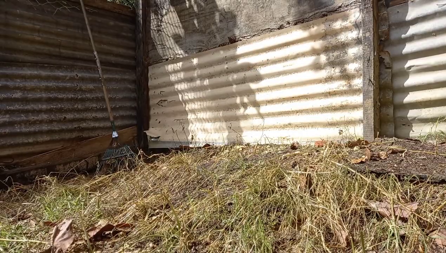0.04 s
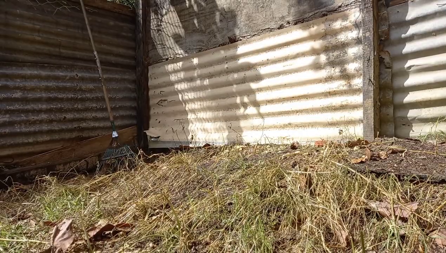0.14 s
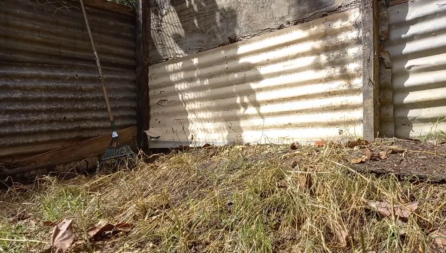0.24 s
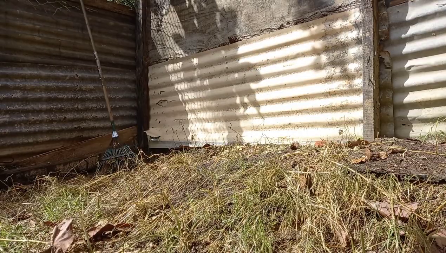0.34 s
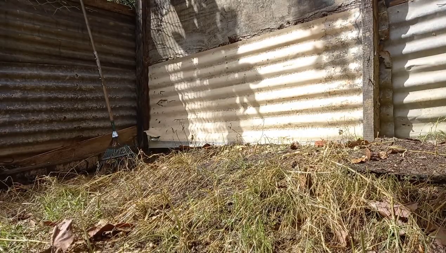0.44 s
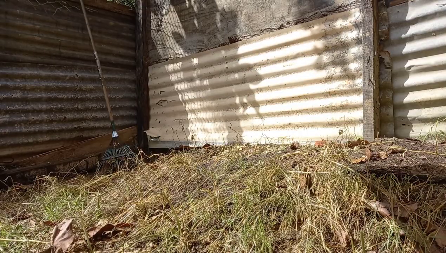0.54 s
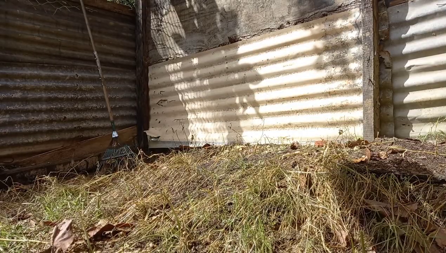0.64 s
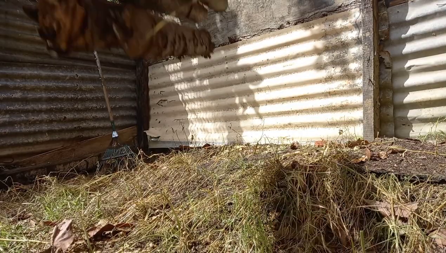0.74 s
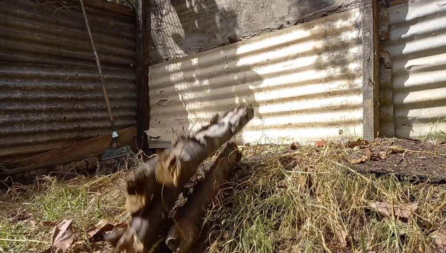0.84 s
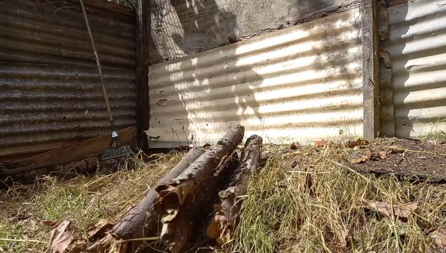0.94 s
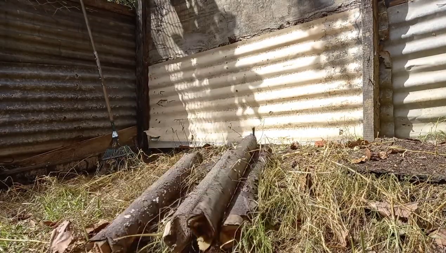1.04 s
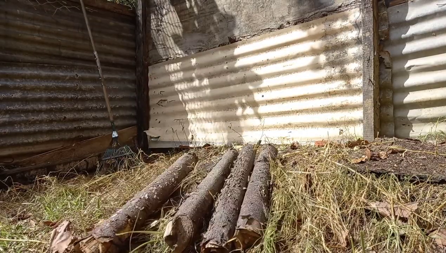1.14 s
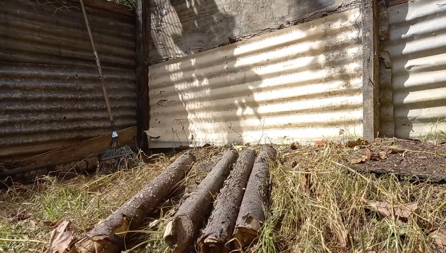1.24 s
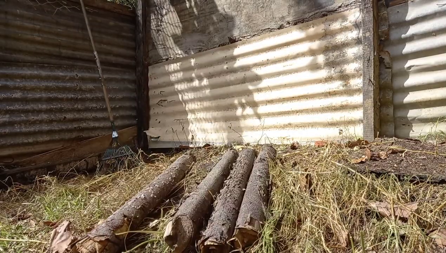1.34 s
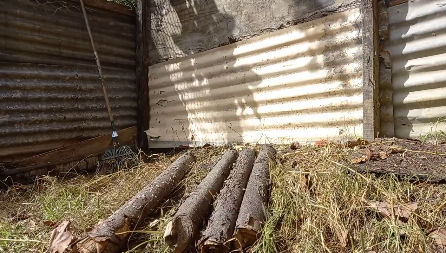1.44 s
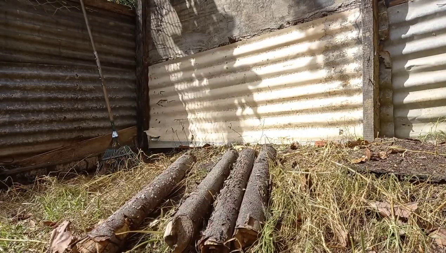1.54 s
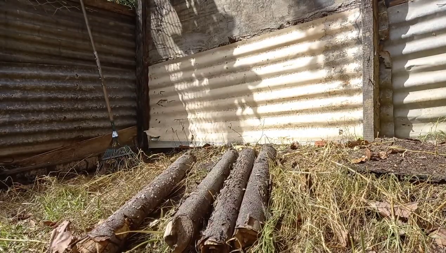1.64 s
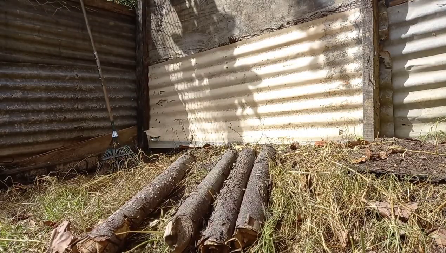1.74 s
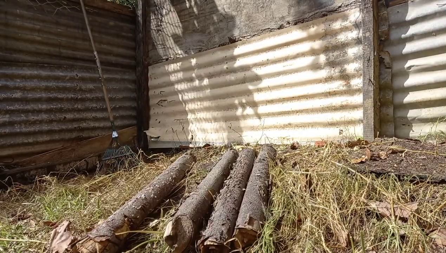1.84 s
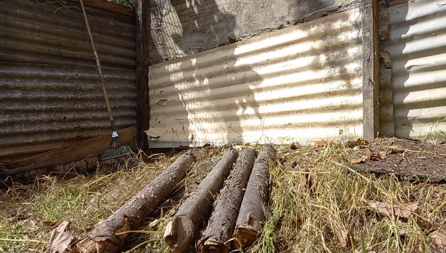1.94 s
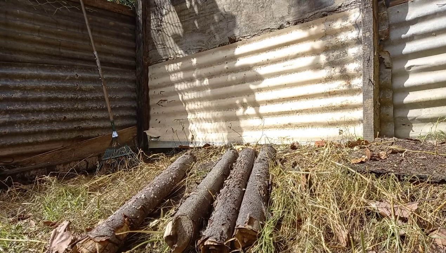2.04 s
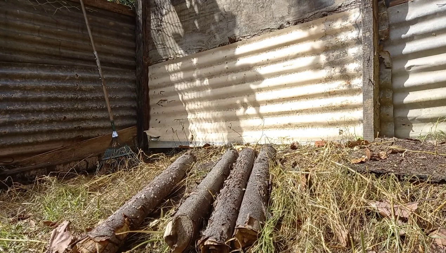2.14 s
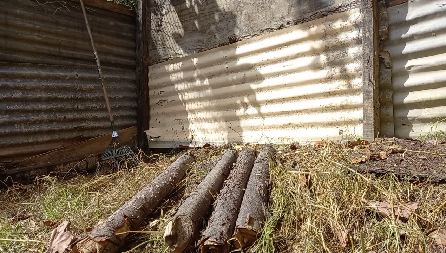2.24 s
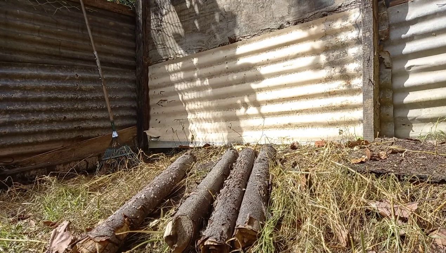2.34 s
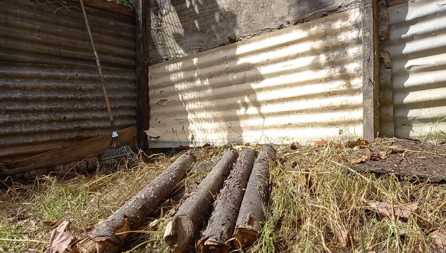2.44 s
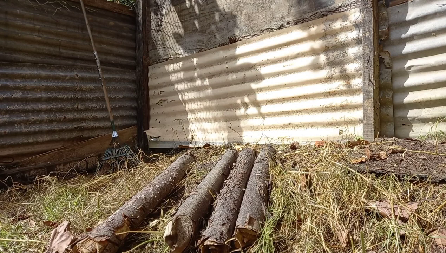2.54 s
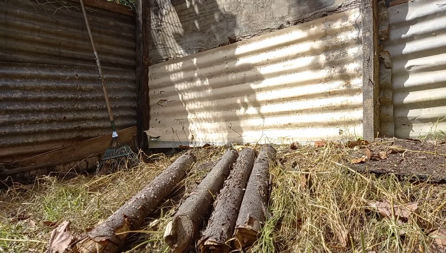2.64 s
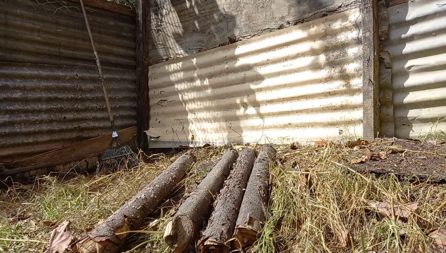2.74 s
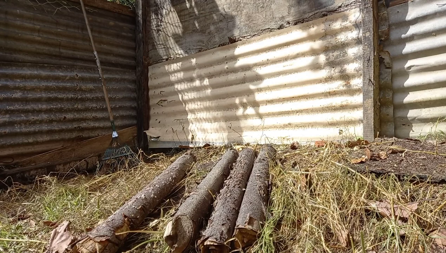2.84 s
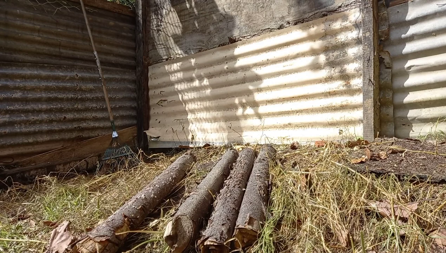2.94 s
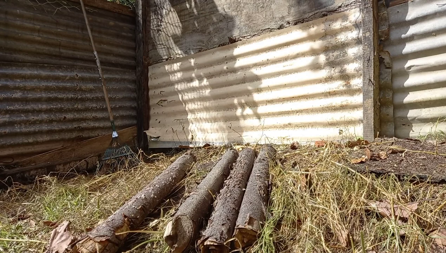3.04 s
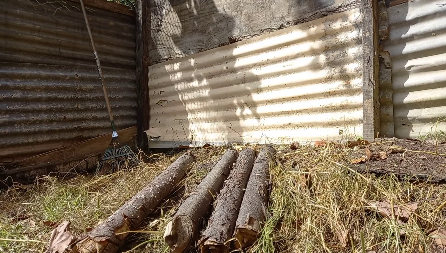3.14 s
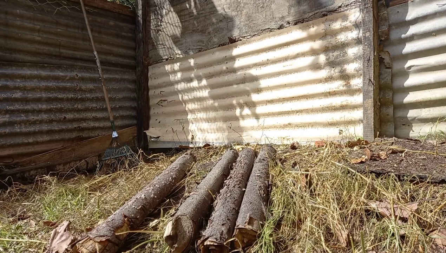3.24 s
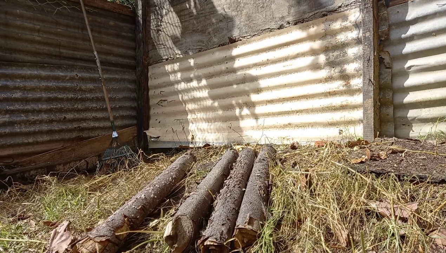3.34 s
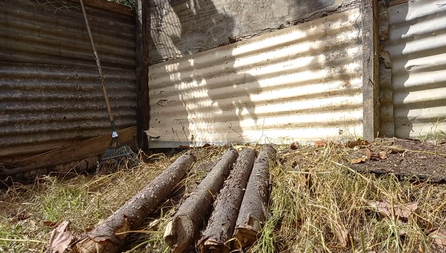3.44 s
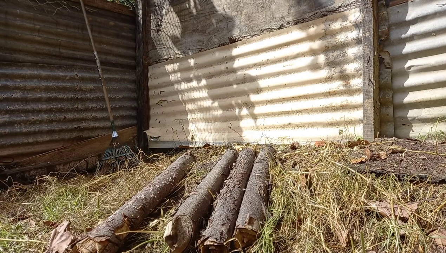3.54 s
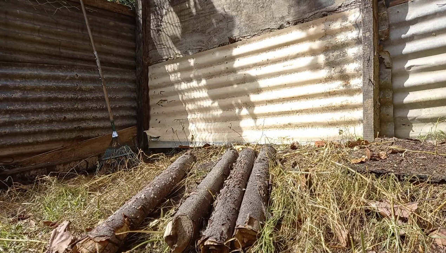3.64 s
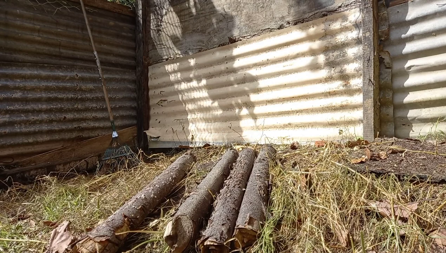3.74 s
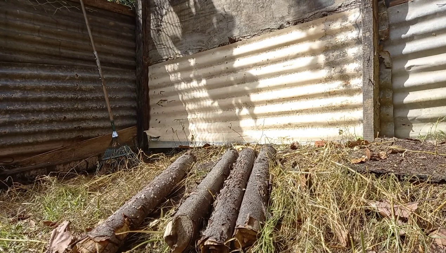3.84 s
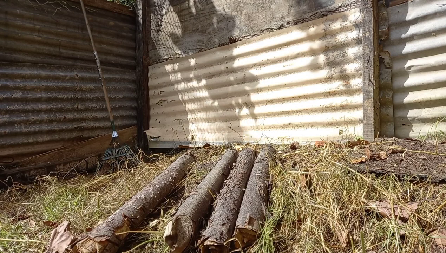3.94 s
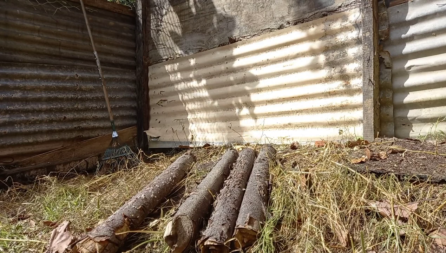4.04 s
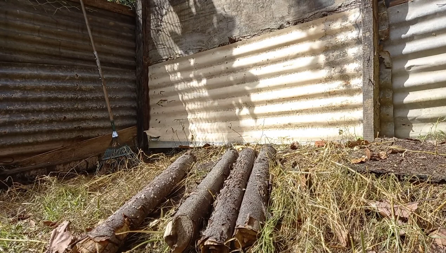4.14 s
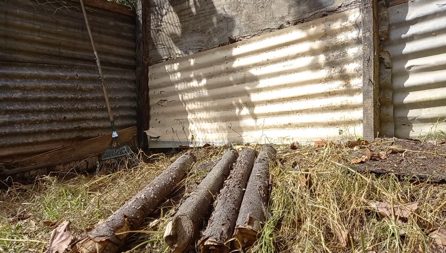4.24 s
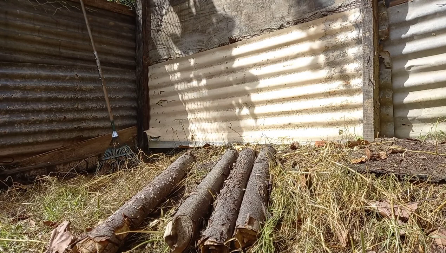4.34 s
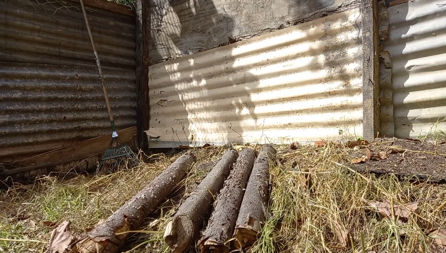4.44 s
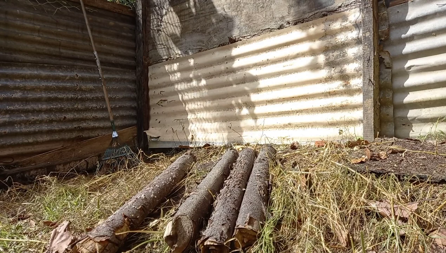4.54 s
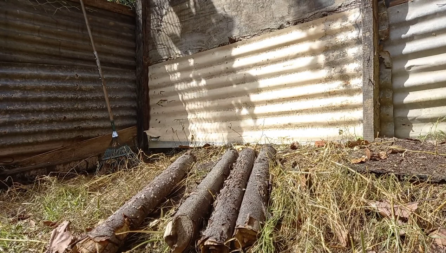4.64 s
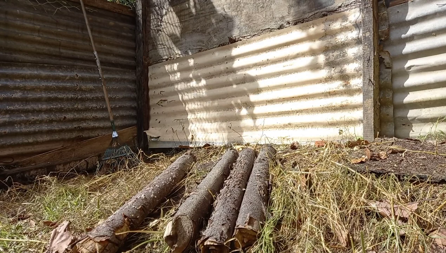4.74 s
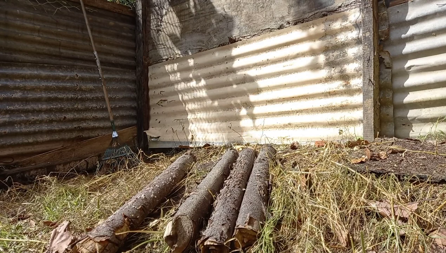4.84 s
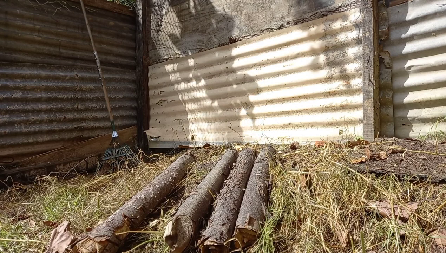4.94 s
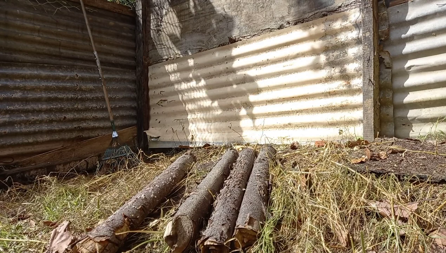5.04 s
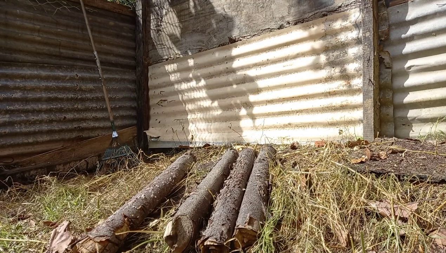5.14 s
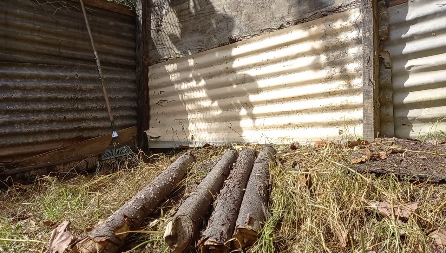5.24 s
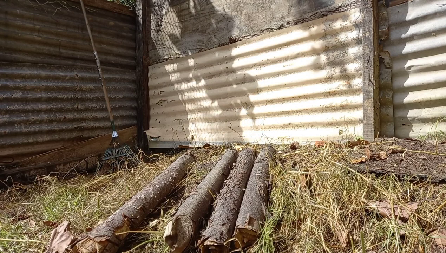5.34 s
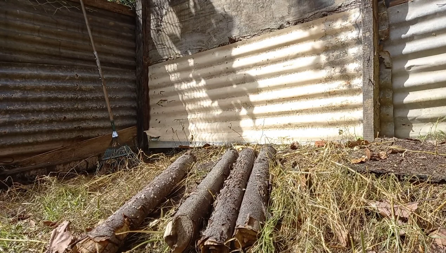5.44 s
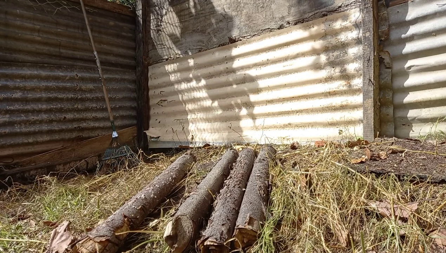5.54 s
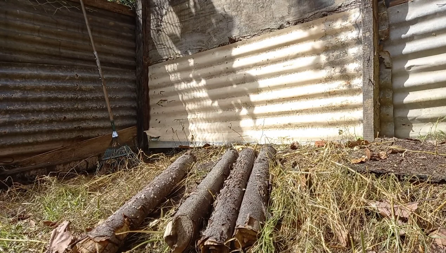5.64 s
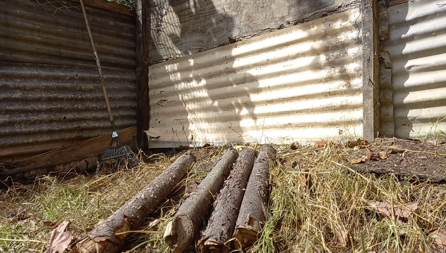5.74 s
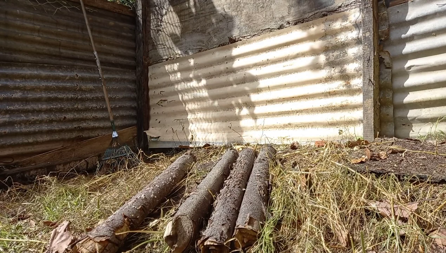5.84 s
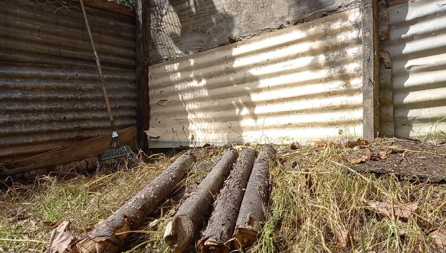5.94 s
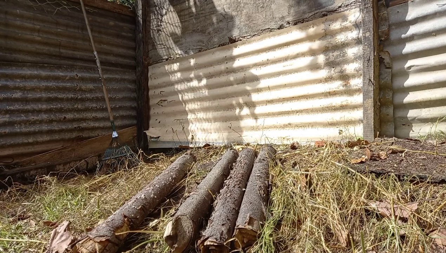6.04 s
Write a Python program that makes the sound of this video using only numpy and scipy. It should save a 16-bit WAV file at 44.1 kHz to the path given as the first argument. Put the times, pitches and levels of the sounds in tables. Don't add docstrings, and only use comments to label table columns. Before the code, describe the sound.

A quiet open-air yard with a soft hush, low town rumble and thin cicada song swelling about three times a second. At 0.11 s logs knock together once, moderately and dry, with grass rustling under shifting feet. At about 0.88 s the load lands right in front: a very loud cluster of hollow wooden knocks lasting under 0.1 s, with crushed grass, sharp stalk snaps and a deep soil thud. A sheet-iron fence hums low until about 1.15 s, as small crackles mark the logs rolling at 1.04-1.2 s. A bird chirps faintly at 1.2 s. The background dips briefly, then returns. Around 2.5-2.7 s feet crunch and snap stalks with faint wood taps; a weak distant engine hums. Faint rustles and wood taps follow at 3.3-4.2 s, a low thump at 3.9 s and bird whistles at 4 s. More whistles come at 5-5.35 s, with a stronger deep thump at 5.2 s, then quiet rustling.

```python
import sys
import numpy as np
from scipy import signal
from scipy.fft import rfft, irfft, next_fast_len
from scipy.io import wavfile
from scipy.ndimage import uniform_filter1d, map_coordinates

SR = 44100
rng = np.random.default_rng(int(sys.argv[2]) if len(sys.argv) > 2 else 0)


def inscribe(sig):
    pcm = np.round(np.clip(np.atleast_2d(sig).T, -1, 1) * 32767)
    wavfile.write(sys.argv[1], SR, pcm.astype(np.int16))


def gain_from_db(level_db):
    decades = np.asarray(level_db, float) / 20
    return 10 ** decades


N = 268727
T = np.arange(N) / SR


def unit(x):
    return x / np.sqrt(np.mean(x ** 2) + 1e-20)


def along(points, hz):
    f, v = np.transpose(points)
    return np.interp(np.log(hz + 1), np.log(f + 1), v)


def curves(rows):
    s, *cols = np.transpose(rows)
    return [np.interp(T, s, c) for c in cols]


def wobble(rate):
    return map_coordinates(rng.standard_normal(int(N * rate / SR) + 4), [T * rate])


def noise():
    return rng.standard_normal((2, N))


def filtered(x, response):
    m = next_fast_len(N + SR // 2)
    return irfft(rfft(x, m) * response(np.fft.rfftfreq(m, 1 / SR)), m)[..., :N]


def coloured(x, points):
    return unit(filtered(x, lambda hz: gain_from_db(along(points, hz))))


def ports(x, lead_s, pan_db=0):
    half = np.array([[1], [-1]]) / 2
    return filtered(x, lambda hz: gain_from_db(pan_db * half) * np.exp(2j * np.pi * hz * lead_s * half))


def bursts(s, db, rise_s, fall_s, floor_db):
    tail_bend = 1.096
    gap = T[::32] - np.array(s)[:, None]
    rising = -gap / np.abs(rise_s)[:, None]
    falling = np.abs(gap / np.array(fall_s)[:, None]) ** tail_bend
    loss = np.where(gap < 0, rising, falling)
    power = (gain_from_db(np.array(db)[:, None] - 20 * loss) ** 2).sum(0) + gain_from_db(floor_db) ** 2
    return np.interp(T, T[::32], np.sqrt(power))


# hz, likeness (0 to 1)
LIKENESS = [(60, .96), (200, .93), (400, .7), (900, .2), (2000, 0), (15000, 0)]


def diffuse(pair, spectrum):
    def mix(hz):
        turn = np.arccos(np.clip(along(LIKENESS, hz), -1, 1)) / 2
        return gain_from_db(along(spectrum, hz)) * [np.cos(turn), np.sin(turn)]
    mid, side = filtered(pair, mix)
    return unit(np.array([mid + side, mid - side]))


def echoes(x, decays):
    hz, t, z = signal.stft(rng.standard_normal((2, SR // 2)), SR, nperseg=256)
    alike = along(LIKENESS, hz)[:, None]
    z[1] = alike * z[0] + np.sqrt(1 - alike ** 2) * z[1]
    fade = gain_from_db(-60 * t / along(decays, hz)[:, None])
    tail = signal.istft(z * fade, SR, nperseg=256)[1]
    late = np.pad(x, (300, 0))[None]
    return signal.fftconvolve(late, tail / np.linalg.norm(tail[0]), axes=1)[:, :N]


# hz, level_db (per Hz)
AIR_SPECTRUM = [(15, -43.5), (25, -16), (80, -5), (190, -21.5), (335, -14.5), (1160, -28), (1740, -28),
                (2050, -22.5), (2480, -35.5), (3160, -40), (4140, -7), (4870, -25.5), (6740, -20.5),
                (7510, -35), (16000, -47.5)]


def air():
    return gain_from_db(-63) * diffuse(noise(), AIR_SPECTRUM)


def hum(rows, rough_db):
    hz, db = curves(rows)
    on = uniform_filter1d(1. * (T > rows[0][0]) * (T <= rows[-1][0]), size=2000)
    level = np.sqrt(2) * gain_from_db(db + rough_db * wobble(15))
    return on * level * np.sin(2 * np.pi * np.cumsum(hz) / SR)


# time_s, firing_hz, level_db
ENGINE_HUM = [
    (2.2, 56.5, -77.5),
    (2.78, 59.8, -50.5),
    (3.33, 67.2, -63.5),
    (3.91, 66.2, -62.5),
    (4.15, 66.5, -75.5),
    (5.12, 63.9, -59),
    (5.22, 61.7, -58),
    (5.44, 65.3, -63),
    (6.09, 62.5, -66),
]


def engine():
    return hum(ENGINE_HUM, rough_db=1.5)


# peak_s, boom_db, body_db, rise_s, fall_s
GROUND_THUMPS = [(.12, -78, -58, 0.045, 0.27), (.22, -63, -62, 0.17, 0.37),
                 (0.881, -28.5, -26.5, 0.0037, 0.096), (.66, -80, -69, 0.18, 0.26),
                 (.96, -44, -61, 0.058, 0.089), (1.121, -48, -51.5, .25, 0.072),
                 (1.27, -54.5, -75, .1, 0.15), (2.53, -52.5, -64.5, 0.096, 0.64),
                 (3.37, -71, -65, 0.55, 0.46), (3.864, -40, -47, 0.13, 0.17),
                 (4.16, -69.5, -64, 0.12, 0.16), (5.21, -30.5, -47, 0.062, 0.14),
                 (5.301, -48, -60, 0.1, 0.21), (5.16, -59.5, -55.5, 0.05, .1)]
# hz, level_db (per Hz)
BOOM_SPECTRUM = [(15, -57), (25, -25), (40, -16), (48, -7.5), (70, 3), (102, 4.5), (123, -6), (150, -28.5),
                 (200, -49.5), (330, -120)]
# hz, level_db (per Hz)
BODY_SPECTRUM = [(71, -27.5), (120, -9.5), (177, -20), (231, -20.5), (300, -18.5), (600, -33.5),
                 (780, -68.5), (1320, -120)]


def thumps():
    rumble_db, murmur_db = -66, -74
    s, boom_db, body_db, rise_s, fall_s = np.transpose(GROUND_THUMPS)
    boom = bursts(s, boom_db - 3.0, rise_s, fall_s, rumble_db - 2.5)
    body = bursts(s, body_db, rise_s, fall_s, murmur_db)
    return boom * diffuse(noise(), BOOM_SPECTRUM) + body * diffuse(noise(), BODY_SPECTRUM)


# time_s, pitch_hz, level_db
SHEET_HUM = [
    (0.93, 91.54, -37),
    (0.996, 82.97, -39.5),
    (1.124, 82, -40.5),
    (1.154, 82.7, -54),
    (1.4, 83.4, -68),
]


def fence():
    return hum(SHEET_HUM, rough_db=.6)


# start_s, length_s, from_hz, to_hz, level_db
WHISTLES = [(1.218, 0.042, 4870, 4820, -55), (1.273, 0.07, 4400, 2604, -60.5),
            (3.936, 0.024, 5220, 5120, -59.5), (3.958, 0.036, 5140, 4750, -52),
            (3.993, 0.082, 4560, 3100, -57.5), (4.007, 0.033, 4950, 4980, -63),
            (4.992, 0.034, 4480, 5257, -51.5), (5.012, 0.035, 5420, 5470, -53.5),
            (5.049, 0.047, 5450, 5420, -68), (5.002, 0.05, 4770, 4570, -56.5),
            (5.058, 0.065, 3330, 3200, -61.5), (5.121, 0.028, 2770, 2705, -67),
            (5.213, 0.081, 5250, 3260, -49), (5.238, 0.086, 5470, 4340, -58),
            (5.291, 0.034, 3300, 4750, -55), (5.329, 0.045, 4830, 4600, -63.5)]
# hz, t60_s (time to die by 60 dB)
FAR_ECHO = [(2600, 0.63), (6100, 0.56)]


def bird():
    out, flutter = np.zeros(N), 1.2 * wobble(500)
    for s, length, from_hz, to_hz, db in WHISTLES:
        u = np.arange(int(length * SR)) / (length * SR)
        start = round(s * SR)
        glide = 2 * np.pi * np.cumsum(from_hz + (to_hz - from_hz) * u) / SR
        hoarse = flutter[start:][:len(u)] * (abs(to_hz - from_hz) + 250) / 1300
        out[start:][:len(u)] += gain_from_db(db) * np.sin(np.pi * u) ** .4 * np.sin(glide + hoarse)
    song = out * gain_from_db(2.5 * wobble(300))
    return ports(song, lead_s=-0.000388) + echoes(song, FAR_ECHO)


def cicada(rate, jitter, chorus, modes):
    turns = np.cumsum(rate * (1 + jitter * wobble(60))) / SR
    clicks = np.diff(np.floor(turns), prepend=0) * gain_from_db(2.6 * rng.standard_normal(N))
    drive = ports(unit(clicks), lead_s=-.0006) + chorus * noise()

    def belly(f):
        return np.array([[(1j * f * width / (hz * hz - f * f + 1j * f * width)) ** 2] for hz, width, _ in modes])
    return sum(mode[2] * unit(ring) for mode, ring in zip(modes, filtered(drive, belly)))


# peak_s, level_db
SONG_SWELLS = [(0, -56), (0.323, -55), (0.637, -55), (1.0, -65), (1.45, -59.5), (1.76, -60.5),
               (2.07, -60.5), (2.44, -55.5), (2.82, -52.5), (3.13, -53), (3.448, -54.5), (3.65, -69.5),
               (3.815, -53.5), (3.865, -56.5), (4.155, -54), (4.465, -54), (4.74, -72.5), (4.949, -70),
               (5.25, -56), (5.55, -68), (5.731, -66), (5.939, -66)]


def swells(db, late_s, rise_s, fall_s):
    t = T[::64]
    gap = t - late_s - np.array(SONG_SWELLS)[:, :1]
    rising = np.exp(-(gap / rise_s) ** 2)
    sinking = np.exp(-(np.abs(gap) / fall_s) ** 1.4)
    shape = np.where(gap < 0, rising, sinking)
    return np.interp(T, t, (gain_from_db(db[:, None]) * shape).sum(0))


def insects():
    db = np.array(SONG_SWELLS)[:, 1]
    early = 0.79 * swells(db, late_s=-0.014, rise_s=0.01527, fall_s=.04) + gain_from_db(-81.5)
    middle = 1.3 * swells(db, late_s=-.005, rise_s=.025, fall_s=0.11) + gain_from_db(-80.0)
    later = 0.59 * swells(db, late_s=0.017, rise_s=.04, fall_s=0.16) + gain_from_db(-75.5)
    high_modes = [(3814, 66, early), (4037, 200, middle), (4190, 120, later)]
    high = cicada(rate=200, jitter=0.048, chorus=0.6, modes=high_modes)
    low_db = -61 + (db + 52.5)
    low_swells = swells(low_db, late_s=0.018, rise_s=0.035, fall_s=0.075)
    low_gain = gain_from_db(1.1 * wobble(30)) * (low_swells + gain_from_db(-74.0))
    return high + cicada(rate=110, jitter=0.16, chorus=0.98, modes=[(2084, 250, low_gain)])


def crackle(rate, spread_db):
    hits = rng.random((3, N)) < rate / SR
    sizes = gain_from_db(spread_db * rng.exponential(size=(3, N))) * rng.normal(size=(3, N))
    return 0.45 * unit(hits * sizes) + rng.standard_normal((3, N))


# peak_s, crunch_db, rise_s, fall_s, tips_db (over the crunch)
LOAD_CRUSH = [(.853, -58.5, .012, .05, -9.5), (.87, -51, .02, .03, 2), (0.88, -28.5, .008, .015, -6.5),
              (.894, -31.5, .012, .07, -7.5), (.99, -62.5, .05, 0.16, -2.5),
              (1.042, -50.5, .012, 0.042, -8), (1.069, -50, .004, .02, -3), (1.082, -44.5, .008, .025, -2),
              (1.098, -45, .012, .05, 0.5), (1.135, -52.5, .06, 0.061, 1), (1.21, -65.5, .08, 0.16, -1.5)]
# peak_s, crunch_db, rise_s, fall_s, tips_db (over the crunch)
FOOTSTEPS = [(.03, -68.5, 0.18, 0.23, -5.5), (0.121, -53, 0.068, .17, -1.5), (.22, -63, 0.21, 0.091, -3.5),
             (.49, -61.5, 0.092, .12, -3), (1.82, -69, 0.11, 0.286, -0.5), (2.051, -66, 0.13, .15, -0.5),
             (2.21, -69.5, 0.16, 0.1, -0.5), (2.4, -70.5, 0.28, 0.195, -7.5),
             (2.495, -47, 0.008, 0.086, -3), (2.513, -48.5, .02, .06, -2), (2.535, -47.5, .03, .04, -4),
             (2.617, -48, .01, .03, -8), (2.577, -50, 0.075, 0.11, 1.5), (2.633, -43.5, 0.036, 0.038, -7.5),
             (2.688, -48, 0.015, .025, -2), (2.7, -53.5, 0.035, 0.082, -2), (2.9, -70.5, 0.75, 0.31, -7.5),
             (3.322, -68.5, 0.201, 0.29, -5.5), (3.431, -58, 0.16, 0.16, -3.5),
             (3.54, -74.5, 0.09, .12, 5.5), (3.736, -66.5, 0.059, 0.17, 0.5),
             (3.83, -61.5, 0.14, 0.24, -1.5), (4.03, -66, 0.48, 0.14, -8), (4.15, -65, 0.12, 0.142, -6),
             (4.52, -72.5, 0.15, 0.12, -11), (5.19, -57, 0.147, 0.334, -14.5),
             (5.757, -69, 0.022, 0.2, -1.5), (5.899, -72.5, .15, 0.1106, -2)]
# peak_s, level_db, rise_s, fall_s
TURF_PRESS = [(0.122, -52, 0.046, 0.16), (.24, -63.5, 0.66, 0.33), (.5, -64.5, 0.1, 0.36),
              (.853, -65, 0.045, 0.13), (0.879, -30.5, .008, .012), (0.889, -30, 0.0051, 0.09),
              (1.083, -49.5, 0.066, 0.083), (1.19, -61.5, 0.083, 0.097), (1.881, -66, 0.17, .2),
              (2.23, -60, 0.075, 0.13), (2.476, -61.5, 0.05, 0.11), (2.508, -53, 0.09, 0.22),
              (2.64, -53, 0.14, 0.19), (2.951, -70, 0.21, 0.17), (3.731, -70, 0.077, .1),
              (4.47, -70.5, 0.039, 0.21), (3.43, -65, 0.29, 0.24), (3.85, -69, 0.17, 0.28),
              (4.15, -68, 0.097, 0.12), (5.25, -64, .15, 0.11)]
# hz, level_db (per Hz)
STALK_SPECTRUM = [(710, -33.5), (1200, -10), (1510, -10.5), (1820, -17), (1950, -6), (2570, -1.5),
                  (3050, -3.5), (3300, -3), (4100, -1), (4760, -1.5), (6310, 0.5), (7800, -19),
                  (10100, -44.5), (17200, -120)]
# hz, level_db (per Hz)
TIP_SPECTRUM = [(4120, -31.5), (7000, -3), (7740, -9.5), (8980, -3), (12700, -1.5), (16000, -7)]
# hz, level_db (per Hz)
WEIGHT_SPECTRUM = [(120, -45.5), (200, -22), (381, -1.5), (436, -2), (590, -1.5), (1830, -0.5), (2400, -8),
                   (3120, -31), (5280, -120)]
# hz, level_db
SHOE_COLOUR = [(900, 0), (1700, -3), (2800, 1), (4900, -0.5), (6500, -1), (7500, -1)]


def grass():
    s, db, rise_s, fall_s, tips_db = np.transpose(LOAD_CRUSH + FOOTSTEPS)
    crunch = bursts(s, db, rise_s, fall_s, -81.5)
    tips = bursts(s, db + tips_db, rise_s, fall_s, -91.5)
    press = bursts(*np.transpose(TURF_PRESS), -82.5)
    fibres = crackle(rate=3000, spread_db=2.8) * gain_from_db(.8 * wobble(45) + 1.5 * wobble(200))
    ahead = (T > .8) & (T < 1.5)
    direct = ports(fibres[0] * ahead, lead_s=0) + ports(fibres[0] * ~ahead, lead_s=.0003, pan_db=-1)
    near = 0.58 * direct + fibres[1:]
    weight = coloured(0.98 * direct + 0.78 * fibres[1:], WEIGHT_SPECTRUM)
    stalks = coloured(near, STALK_SPECTRUM)
    underfoot = filtered(stalks, lambda hz: gain_from_db(along(SHOE_COLOUR, hz)))
    stalks = np.where(ahead, stalks, underfoot)
    dry_tips = coloured(near, TIP_SPECTRUM)
    return gain_from_db(5.5) * crunch * stalks + gain_from_db(4.5) * tips * dry_tips + gain_from_db(4.0) * press * weight


# start_s, peak_db, pitch_hz
LOG_STALKS = [(0.849, -33.5, 1890), (0.854, -36, 2200), (.863, -23, 5336), (.867, -32.5, 2300),
              (.8777, -6, 2460), (0.8868, -9.5, 1630), (.8964, -7, 2261), (.907, -16.5, 2200),
              (1.039, -28.5, 5740), (1.043, -32.5, 4500), (1.0712, -28.5, 3040), (1.0806, -25, 5840),
              (1.0976, -25.5, 6030), (1.1005, -28.5, 3230), (1.1238, -24.5, 6470), (1.147, -30.5, 6300),
              (1.184, -28, 6530), (1.1872, -32, 6400), (1.2241, -42.5, 6630)]
# start_s, peak_db, pitch_hz
FOOT_STALKS = [(0.1047, -41, 2120), (0.1542, -33, 6943), (.192, -29.5, 1910), (.196, -40, 4600),
               (.2269, -39, 6636), (0.2514, -43.5, 1600), (.266, -46, 1550), (.375, -45, 1700),
               (.515, -46.5, 2040), (.4618, -46.5, 4190), (.4942, -40.5, 2170), (.8102, -38.5, 2056),
               (2.026, -43, 6540), (2.062, -36, 4200), (2.1536, -48.5, 4310), (2.2122, -36.5, 6770),
               (2.2127, -33, 2230), (2.4538, -35.5, 2290), (2.4913, -30.5, 6630), (2.5345, -31, 6013),
               (2.5681, -26.5, 2550), (2.615, -31, 3380), (2.6278, -26, 5700), (2.633, -29.5, 4605),
               (2.6852, -32, 6217), (2.6872, -23, 6020), (3.0203, -53, 6100), (3.4074, -38, 3900),
               (3.4254, -35.5, 4220), (3.7359, -46, 4166), (3.7844, -44.5, 3800), (3.7108, -45.5, 6700),
               (5.6728, -55.5, 6100), (5.7501, -47.5, 5550), (5.804, -46.5, 4640), (5.851, -51.5, 6630)]


def snaps():
    body, edge, t = np.zeros((2, N + SR)), np.zeros((2, N + SR)), np.arange(SR // 40) / SR
    events = [(*row, 1.5) for row in LOG_STALKS] + [(*row, 7) for row in FOOT_STALKS]
    for s, db, hz, pan_db in sorted(events):
        ring = .7 * np.sin(2 * np.pi * hz * t) * gain_from_db(-60 * t / (.003 + 7 / hz))
        click = gain_from_db(db - 60 * t / .012) * rng.standard_normal((3, len(t)))
        edge_db = -9.5 + 6 * np.log2(hz / 6000)
        for side, (sign, late) in enumerate([(0.81, 0), (-1.3, 13)]):
            start, pan = round(s * SR) + late, gain_from_db(sign * pan_db)
            burst = pan * (click[0] + 0.23 * click[1 + side])
            body[side, start:][:len(t)] += gain_from_db(db) * pan * ring + 0.45 * np.sqrt(hz / 6000) * burst
            edge[side, start:][:len(t)] += gain_from_db(edge_db) * burst

    def dull(hz):
        return 1 / (1 + (hz / 7300) ** 16)
    low_part = filtered(body[:, :N], lambda hz: dull(hz) * hz ** 2 / (hz ** 2 + 1100 ** 2))
    return low_part + filtered(edge[:, :N], lambda hz: 1 - dull(hz))


# start_s, peak_db, struck_hz, crack_db, width_octaves (of the modes set ringing)
LOG_KNOCKS = [(0.1116, -18.5, 513, -27, 0.21), (.1135, -33, 1070, -25, 0.11), (.1192, -22, 540, -29.5, 0.1),
              (.13, -30, 520, -20, 0.42), (0.13, -38, 1100, -20, 0.13), (.141, -32.5, 540, -17.5, 0.19),
              (.152, -45, 540, -21, .19), (.2505, -53, 540, -8, 0.27), (0.854, -41.5, 1117, -14, 0.19),
              (0.874, -28, 1466, -8.5, 0.43), (0.8785, -15, 290, -8, 0.13),
              (0.8883, -7.5, 1466, -13.5, .35), (0.8893, -2.5, 500, -21.5, 0.28),
              (.8948, 0, 870, -21, 0.22), (.8965, -14.5, 2515, -13, .2), (.9015, -14.5, 500, -18, .2),
              (0.9064, -8.5, 480, -12.5, 0.3), (.913, -9, 423.5, -21, 0.33),
              (.923, -16.5, 423.8, -23, 0.43), (0.9294, -10.5, 474, -24.5, 0.23),
              (.940, -21.5, 433, -21.5, 0.29), (0.963, -35.5, 794, -13.5, 0.55),
              (1.045, -40.5, 1045, -11.5, 0.22), (1.083, -35, 473, -3, 0.19),
              (2.508, -35.5, 596, -6.5, 0.34), (2.527, -34, 560, -10, 0.26), (3.324, -44, 324, -4.5, 0.45),
              (4.138, -38.5, 407, -12, 0.2), (4.158, -43, 404, -7.5, 0.39)]
# pitch_hz, level_db, t60_s (time to die by 60 dB)
WOOD_MODES = [(290, -12, 0.076), (343.6, -4.5, 0.21), (420.3, 0.5, 0.088), (461.3, -4, 0.077),
              (540, 3, 0.039), (794, -3, 0.027), (903, 4, 0.02), (1045, -7.5, 0.021), (1117, -4.5, 0.08),
              (1466, -11, 0.077), (1586.5, -11, 0.14), (1910, -5, 0.059), (2207, -12, 0.15),
              (2515, -10, 0.046), (2920, -8.5, .06)]
LOG_RESTS = [.126, .166, .3, .868, .9, .945, 1.0, 1.06, 1.13, 2.55, 3.37, 4.19]
# pitch_hz, level_db, t60_s
SOIL_THUD = [
    (99, -17, .16),
    (185, -11, 0.047),
    (55, -24.5, .08),
]
# hz, t60_s
YARD_ECHO = [(100, 0.26), (500, .16), (2000, .24), (8000, .18)]


def logs():
    out, t = np.zeros((2, N + SR)), np.arange(SR // 3) / SR
    hz, level, t60 = np.transpose(WOOD_MODES)[..., None]
    for s, db, pitch_hz, crack_db, width in LOG_KNOCKS:
        rest_s = min(r for r in LOG_RESTS if r > s)
        settle = gain_from_db(-60 * np.maximum(t + s - rest_s, 0) / .03)
        reach_db = np.maximum(-6 * (np.log2(hz / pitch_hz) / max(width, .1)) ** 2, -19)
        ring_db = level + reach_db + rng.normal(0, 1, hz.shape) - 60 * t / t60
        ring = gain_from_db(ring_db) * np.sin(2 * np.pi * hz * t)
        crack = gain_from_db(crack_db - 3.0 - 60 * t / 0.011) * rng.standard_normal(len(t))
        ends = np.array([ring[::2].sum(0), ring[1::2].sum(0)])
        contact = 1 - np.exp(-t / (0.001 * gain_from_db(-.15 * db)))
        out[:, round(s * SR):][:, :len(t)] += gain_from_db(db - 4.5) * (ends * settle * contact + crack / 2)
    landing = round(.8775 * SR)
    for hz, db, t60 in SOIL_THUD:
        thud = gain_from_db(db - 7 - 60 * t / t60) * np.sin(2 * np.pi * hz * t)
        out[:, landing:][:, :len(t)] += thud * (1 - np.exp(-t / 0.0015))
    wood = out[:, :N]
    end_on_right = ports(wood[0], lead_s=-.00006, pan_db=-2.5)
    end_on_left = ports(wood[1], lead_s=.00016, pan_db=2.5)
    return end_on_right + end_on_left + gain_from_db(-9.5) * echoes(wood.sum(0), YARD_ECHO)


def scene():
    background = air() + engine() + thumps() + fence() + bird() + insects()
    return background + grass() + snaps() + logs()


# time_s, gain_db
AUTO_GAIN = [
    (.95, 1),
    (1.3, -1),
    (1.62, -3.5),
    (1.9, 0),
]


def camera(dry):
    rounded = dry / (1 + np.abs(dry / .88) ** 5) ** .2
    ducked = rounded * gain_from_db(curves(AUTO_GAIN)[0])
    return filtered(ducked, lambda hz: (1j * hz / (1j * hz + 35)) ** 2 * (hz < 15950))


def top_cut(x):
    return signal.sosfilt(signal.butter(12, 16500, fs=SR, output="sos"), x)


def record(dry):
    mix = camera(dry)
    return top_cut(mix)


dry = scene()
out = record(dry)
inscribe(out)
```